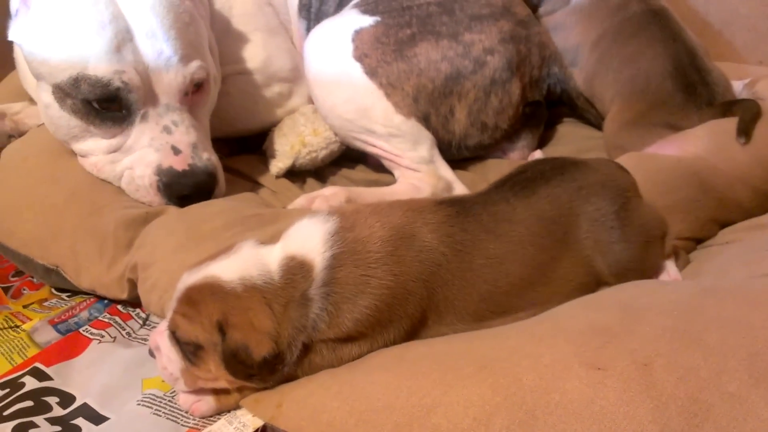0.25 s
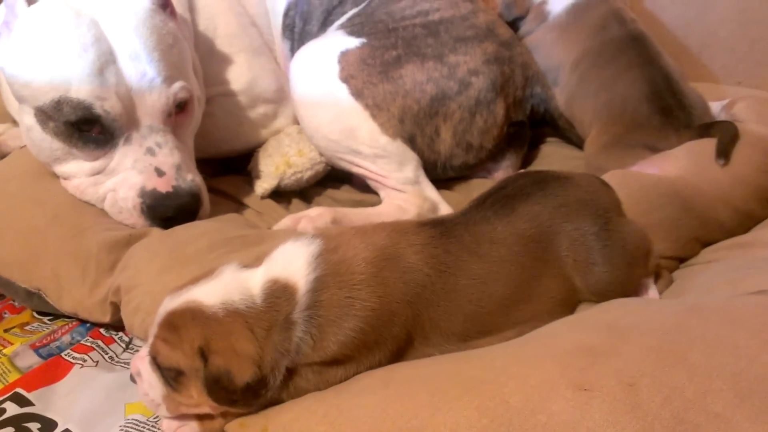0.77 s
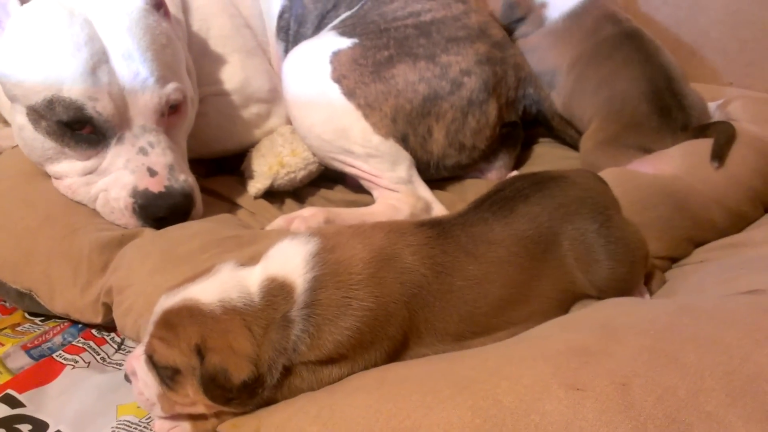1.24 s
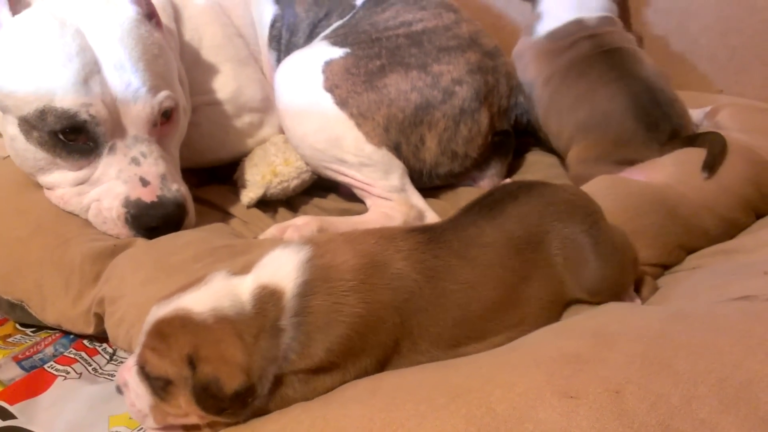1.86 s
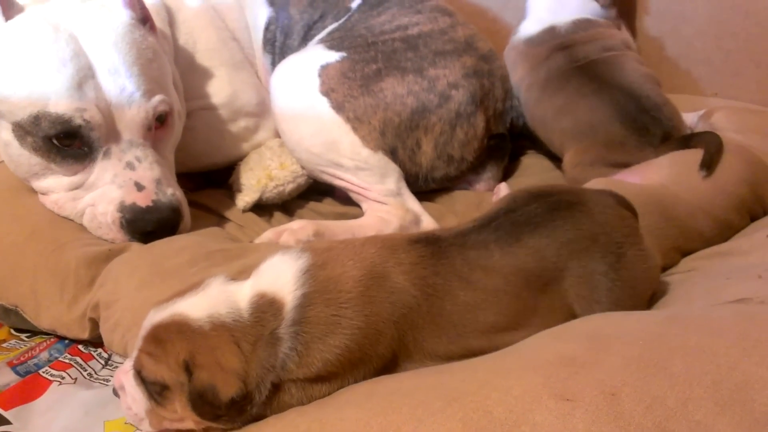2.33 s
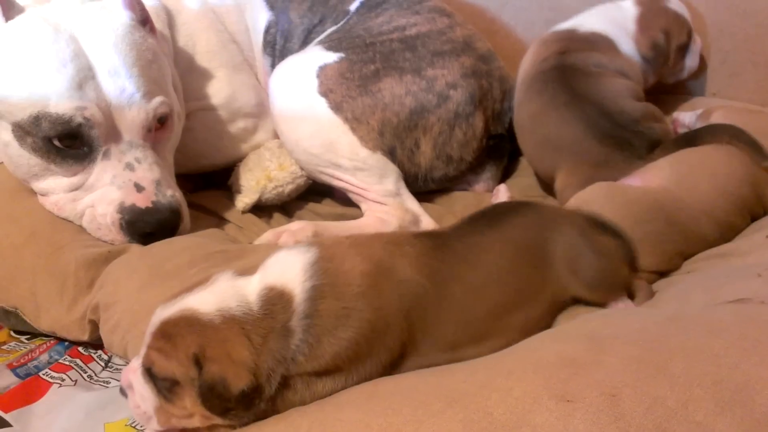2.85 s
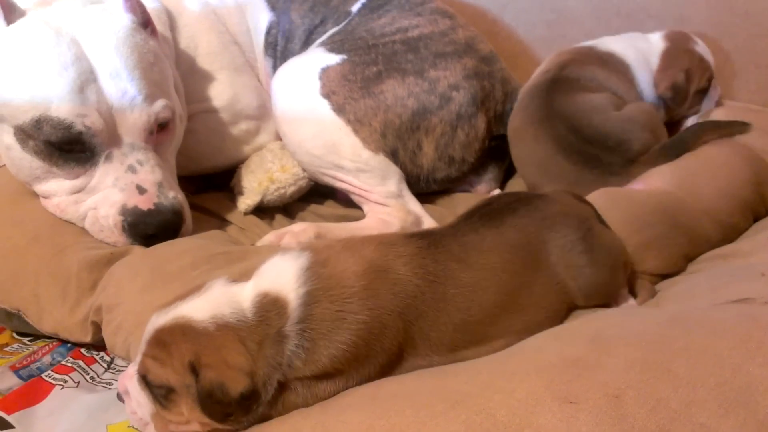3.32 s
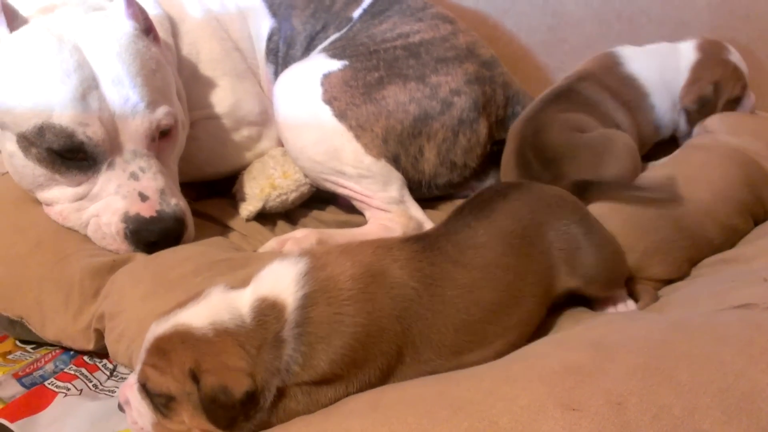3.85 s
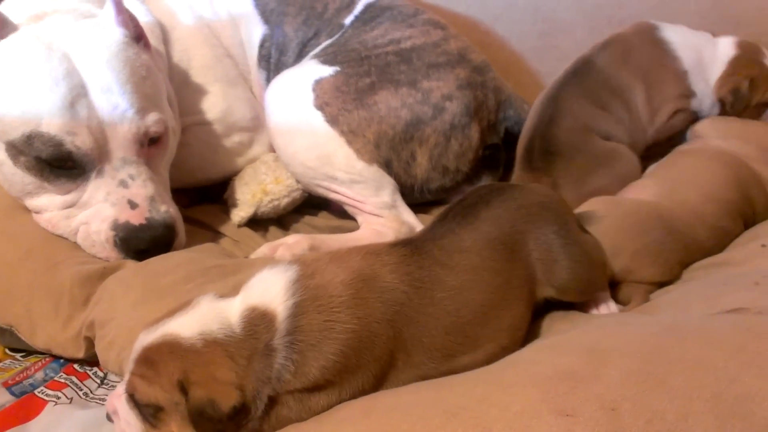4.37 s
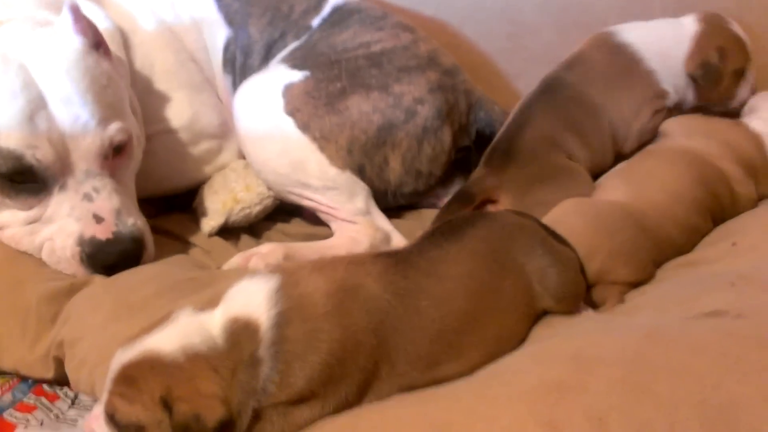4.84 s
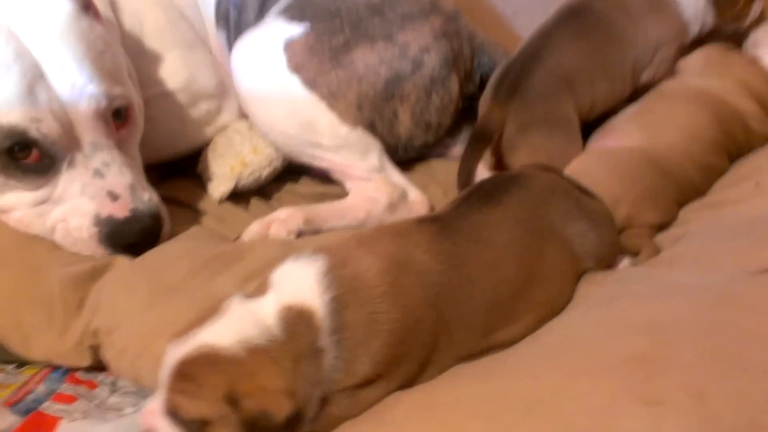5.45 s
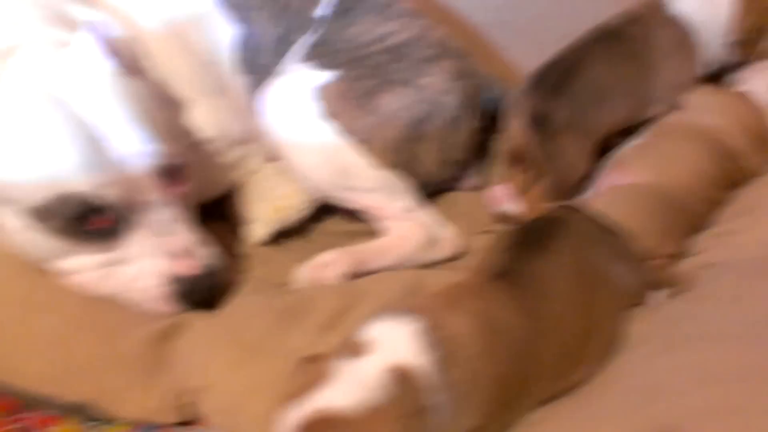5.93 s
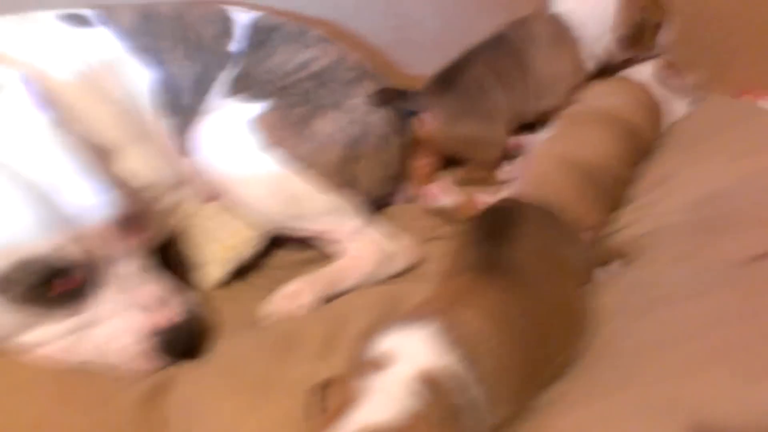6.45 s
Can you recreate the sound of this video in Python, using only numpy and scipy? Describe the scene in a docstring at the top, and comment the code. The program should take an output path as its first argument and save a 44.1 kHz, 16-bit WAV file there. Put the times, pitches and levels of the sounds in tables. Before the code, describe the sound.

High, sometimes hoarse puppy cries break into little squeaks and grunts in a small room, before a puppy scrapes over a cushion.

```python
"""Newborn puppies cry on a cushion in a small room, close to the microphones.
Five long squeals slide between clean and hoarse; then short squeaks break into low grunts.
Each call is a pulse train from the vocal folds, shaped by throat and mouth; squeals and squeaks also
ring in the nose. Gasps, wet mouth clicks and a low grumble sit underneath, over a faint hiss.
At the end a puppy clambers over the bedding, whose slipping fibres scrape and hiss."""
import sys
import numpy as np
from scipy import signal
from scipy.fft import rfft, irfft, next_fast_len
from scipy.io import wavfile
from scipy.ndimage import uniform_filter1d

SR = 44100
rng = np.random.default_rng(int(sys.argv[2]) if len(sys.argv) > 2 else 0)


def unload_wav(signal):
    """Save mono or channel-first audio to the path in sys.argv[1] as 16-bit WAV at rate SR, clipped to [-1, 1]."""
    wavfile.write(
        sys.argv[1],
        SR,
        np.round(np.clip(np.atleast_2d(signal).T, -1, 1) * 32767).astype(np.int16),
    )


N = 295029
TIME = np.arange(N) / SR
BAND_LIMIT_HZ = 15900

# EQ of the room tone: f/Hz, gain/dB
ROOM_TONE_EQ = [(18, -42.5), (30, -20.5), (95, -23), (189, -6), (584, -5), (844, -7.5), (1190, -15.5),
                (1590, -13.5), (1960, -13.5), (4780, -16), (14000, -20.5), (16000, -18.5)]
# reverb time of the room: f/Hz, t60/s
REVERB_TIMES = [(200, 0.17), (800, 0.27), (2000, 0.27), (6000, 0.24), (14000, 0.022)]
# early reflections off near walls: left delay/s, right delay/s, level/dB
REFLECTIONS = [(.0031, 0.0049, -17.5), (.0083, 0.005, -4), (0.0141, .015, -0.5)]
# stereo width of diffuse sound: f/Hz, side gain/dB
DIFFUSE_WIDTH = [(100, -9), (330, 1), (750, -8), (1600, -5.5), (14000, -5)]
# stereo width of the microphone pair: f/Hz, side gain/dB
MIC_WIDTH = [(60, 1.5), (150, -1.5), (320, -9), (600, -6.5), (1000, 2)]
# balance of the microphone pair: f/Hz, left minus right/dB
MIC_BALANCE = [(200, -2.5), (1300, -2.5), (2600, 0), (4400, 7.5), (6300, 5.5), (9000, 0.5), (14000, -0.5)]

# paws and bodies sliding on the bedding: peak t/s, level/dB, rise/s, decay/s, scrape f/Hz
STROKES = [ (5.55, -67, 0.3, .1, 5410), (5.73, -51, 0.056, 0.098, 5400),
           (5.853, -51.5, 0.015, 0.0092, 4100), (6.09, -40, 0.13, 0.029, 4400),
           (6.204, -27, 0.033, 0.041, 5240), (6.313, -31, 0.061, 0.048, 5300),
           (6.536, -25.5, 0.019, 0.017, 3700), (6.653, -42.5, 0.027, 0.05, 5060), ]
# sharp broadband ticks, the crisp edge of one mouth click and then cloth snags: t/s, level/dB, decay/s
SHARP_TICKS = [(4.683, -58, 0.001), (5.59, -53, 0.0028), (5.671, -51, 0.014), (5.707, -32.5, 0.0066),
               (5.711, -29.5, 0.0036), (5.739, -41, 0.0037), (5.758, -44.5, 0.0037), (6.44, -39, 0.033),
               (6.487, -44, 0.0076)]
# EQ of the cloth and the sharp ticks: f/Hz, gain/dB
CLOTH_EQ = [(50, -60), (120, -36), (220, -19.5), (400, -9), (700, -8), (1200, -2), (2200, -3), (4100, 2),
            (5700, 0), (8100, -7), (11000, -14), (16000, -11.5)]
# wet mouth clicks: t/s, level/dB, decay/s
SMACKS = [(1.8145, -44, 0.0035), (1.835, -23, 0.002), (1.851, -27, 0.0011), (2.563, -30, 0.0028),
          (2.96, -53, 0.0031), (4.553, -30.5, 0.0042), (4.683, -31.5, 0.00075)]
# EQ of the mouth clicks: f/Hz, gain/dB
SMACK_EQ = [(50, -44), (150, -23.5), (300, -8.5), (620, 4), (1400, 6.5), (2400, -7), (3300, -16.5),
            (5000, -24.5), (14000, -37)]
# bouts of low rattling grumble: t/s, length/s, level/dB
GRUMBLES = [(3.367, 0.32, -58), (3.678, 0.22, -48.5), (3.844, 0.31, -53)]
# throat resonances on the grumble: f/Hz, gain/dB
GRUMBLE_EQ = [(100, -29), (160, -11), (220, 4), (340, -9), (520, 9), (680, -9), (820, -15), (1200, -29.5),
              (4000, -64)]
# gasps before a cry: t/s, length/s, level/dB
GASPS = [(1.826, 0.046, -29.5), (2.637, 0.086, -42)]
# air through the open mouth: f/Hz, gain/dB
GASP_EQ = [(50, -56), (150, -25), (300, -1), (600, -49.5), (950, -8), (1430, 3), (2000, -10), (2500, -14.5),
           (3300, -1.5), (4200, -24), (6000, -40.5), (14000, -56)]

# grunts, a second vibration in the throat:
# t/s, length/s, first f/Hz, last f/Hz, level/dB, roughness/0-1, overtone gain/dB
GRUNTS = [ (2.736, 0.07, 229, 266.4, -35, 0.38, -5), (2.798, 0.042, 489, 460.3, -27, 0.33, 0),
          (3.172, 0.06, 278.3, 315, -33, 0.1, -5), (3.645, 0.066, 299.3, 328, -32, 0.12, -5),
          (3.937, 0.05, 350, 409, -35, 0.14, -5), (3.981, 0.053, 439, 485.6, -39, 0.4, -3),
          (4.242, 0.044, 394.8, 397.2, -38, 0.15, -3.5), (4.552, 0.038, 403.5, 490, -40, 0.33, 1),
          (4.879, 0.021, 500, 470, -52.5, 0.26, 0), (5.117, 0.055, 332.6, 313.5, -48, 0.28, -2.5),
          (5.45, .1, 398, 471.4, -54.5, 0.63, 1), (5.982, 0.054, 324, 316, -47.5, 0.23, 0),
          (6.064, 0.072, 460.2, 430, -36, 0.07, 0), (6.475, 0.062, 381.8, 419, -43.5, 0.54, 1),
          (6.546, 0.037, 427, 407, -38, 0.25, -1), ]
# throat resonances on a grunt: f/Hz, gain/dB
GRUNT_EQ = [(50, -59), (130, -32), (220, -0.5), (320, 0.5), (450, 6), (620, -5), (920, -6.5), (1200, -25.5),
            (1700, -14.5), (2400, -30.5), (3000, -37), (5400, -37.5), (8000, -64), (14000, -70)]
# short squeaks: t/s, length/s, top f/Hz, rise/s, sag/share of pitch, level/dB, swell/dB, mouth/dB,
# mouth change/dB, nasal ring/dB, first roughness/0-1, last roughness/0-1, subharmonics/0-1,
# break-up/share of length, whistle/dB, whistle f/Hz, whistle peak/share of length
SQUEAKS = [ (3.158, 0.078, 880, .06, 0, -50, 6, -11, 0, -33, 0.29, 0.58, .4, .5, -11.5, 4950, .6),
           (3.622, .11, 791.5, 0.009, 0.03, -37, -7.5, -15.5, -2, -30, 0.11, 0.4, 0.3, .47, -23.5, 5500, .45),
           (3.902, 0.13, 861.7, 0.03, 0.11, -33, 8, -13, 2, -35, 0.15, 0.69, 0.6, 0.36, -28, 5400, 0.61),
           (4.216, 0.093, 813.6, 0.03, 0.12, -34, 11.5, -14, -4, -37, 0.17, 0.72, 0.05, 0.66, -33, 5730, 0.47),
           (4.515, 0.086, 858.4, 0.056, 0.3, -35.5, 2, -11.5, -9, -29, 0.04, 0.65, 0.03, 0.49, -27, 5600, 0.58),
           (4.838, 0.061, 825, 0.042, 0.1, -33.5, 15.5, -11, -3, -37, 0.08, 0.2, 0.1, 0.86, -24, 5550, 0.49),
           (5.398, 0.164, 1030, 0.085, 0.01, -39.5, 10, -3.5, 2.5, -27, 0.15, 0.36, 0.6, 0.29, -11, 5370, .45),
           (5.917, .22, 1083, 0.079, 0.2, -31.5, 16, -3, -5, -25, 0.21, 0.36, .8, 0.67, -13, 5400, .52),
           (6.426, 0.15, 969, 0.078, 0, -31, 3.5, -8.5, 7.5, -23, 0.27, 0.73, 0.7, 0.44, -26, 5400, 0.32), ]
# throat resonances on a squeak: f/Hz, gain/dB
SQUEAK_EQ = [(50, -82), (150, -27), (250, 5), (500, -4.5), (820, 14), (1200, -12), (1700, -1.5),
             (2400, -12.5), (2900, -12), (4300, -19), (5200, -14), (6100, -26), (7000, -35), (9000, -27),
             (13000, -60)]
# throat resonances on the chopped part of a squeak: f/Hz, gain/dB
CHOP_EQ = [(150, -60), (330, -26), (500, -7), (800, 0), (1200, -12), (1700, -2), (2400, -4), (3000, -14),
           (5400, -8)]
# breath hissing in the nose: f/Hz, gain/dB
NASAL_HISS_EQ = [(1500, -59), (2600, -7), (3300, -10), (4000, -1), (4900, 4), (5700, 0.5), (6400, -5.5),
                 (7200, -22), (9000, -39), (13000, -57)]

# contour of each long cry: t/s, pitch f/Hz, level/dB, mouth resonance over that level/dB
CRY_CONTOURS = [
    [(0.0, 1157, -15, 14.5), (0.026, 1032, -32.5, 8.5), (0.052, 953, -18.5, -3.5), (0.09, 965, -26, 4.5),
     (0.16, 842, -26.5, 7.5), (0.292, 842, -23, -0.5), (0.36, 850, -29, 6.5), (0.39, 902, -24.5, -5),
     (0.435, 831, -48.5, 0)],
    [(0.598, 545.3, -60.5, -4.5), (0.638, 582.8, -34.5, -14), (0.692, 623.4, -27.5, -4),
     (0.704, 579, -28.5, -7), (0.77, 543, -19, -5), (0.86, 607.7, -27.5, -7), (0.944, 584.7, -35.5, -3),
     (0.958, 605.5, -29, -15), (0.985, 614, -53.5, -9.5)],
    [(1.118, 844, -58, -9.5), (1.145, 927, -40, -6.5), (1.184, 1087, -34, -6), (1.212, 1030, -41, -18),
     (1.246, 902, -22.5, -1.5), (1.288, 926, -24, -6), (1.398, 918, -19.5, -8), (1.465, 1024, -25, -5),
     (1.505, 1077, -28.5, 3), (1.624, 1124, -24.5, -11.5), (1.735, 1120, -24.5, -5),
     (1.764, 912, -34.5, -10.5)],
    [(1.918, 456, -41, -1.5), (1.936, 476, -38, -13), (1.962, 494.6, -30.5, 9), (1.988, 557, -31.5, -0.5),
     (2.05, 512.5, -30, 11), (2.112, 533.8, -26.5, 2.5), (2.174, 585.7, -30.5, 10),
     (2.298, 596.6, -29, 6.5), (2.37, 724.4, -27, 4), (2.478, 774.3, -26.5, 8), (2.5, 762, -27.5, -4.5),
     (2.54, 750.5, -35.5, -1), (2.585, 770, -40.5, 3)],
    [(2.657, 594, -42.5, -10), (2.69, 621.6, -30, -5), (2.725, 639.4, -34, -1), (2.75, 623.6, -34.5, -1.5),
     (2.78, 537, -36, 5), (2.81, 499, -39.5, 5.5), (2.835, 443, -31, -10), (2.852, 443, -41.5, -2),
     (2.885, 429.5, -48, -8)],
]
# timbre of each cry: nasal ring/dB, its growth/dB, notch f/Hz, notch half-width/Hz, treble tilt/dB,
# hiss/0-1, hoarse opening/s, unsteady opening/s, hoarse ending/s,
# peak strain t/s, extra nasal ring there/dB, sizzle there/dB
CRY_TIMBRES = [ (-23.5, -4.5, 5390, 700, -1.5, 0.01, 0.0013, 0.093, 0.042, 0.036, 8.5, -86),
               (-35.5, 5, 3200, 330, 0, 0.98, .1, 0.16, 0.021, 0.32, 5, -127),
               (-21, 16, 4450, 810, 2, 0.03, 0.073, .12, 0.0013, 1.465, 10, -65),
               (-17.5, 3, 4250, 620, -8, 0.03, 0.023, 0.11, 0.0009, 2.346, 4, -56),
               (-19, 13, 3450, 1100, 1.5, 0.26, 0.019, 0.025, .003, 2.804, 6, -62), ]
# throat resonances on a cry: f/Hz, gain/dB
CRY_EQ = [(50, -78), (130, -46), (250, 1), (400, -20), (560, -5.5), (850, 8.5), (1150, -4), (1350, -1.5),
          (1700, 4.5), (2200, -17), (2650, -25), (3250, -13.5), (3900, -12.5), (4450, -22.5), (5000, -12),
          (5700, -13), (7200, -42.5), (8600, -43), (12000, -95.5)]
# air squeezed past strained folds: f/Hz, gain/dB
SIZZLE_EQ = [(4000, -52), (6800, -10), (8400, 9.5), (9500, -6.5), (11000, -28), (15000, -29)]
# what a rasp adds to a cry: t/s, length/s, roughness/0-1, subharmonics/0-1, hiss/0-1,
# waver/share of pitch, beating from a second, slightly detuned tone/0-1
RASPS = [ (0.704, 0.24, .04, 0.05, 0, .011, .08), (1.224, .23, 0.03, 0, 0.35, .008, .7),
         (1.432, 0.11, 0.15, 0.13, 0.45, .002, 0.16), (1.944, 0.075, .02, 0, 0.05, .012, .12),
         (2.112, 0.075, 0.01, 0, 0.25, 0.011, .1), (2.307, 0.074, 0.01, 0, .25, 0.008, .1),
         (2.472, 0.0898, 0.12, 0.09, 0.6, 0.016, 0), (2.655, 0.085, 0.13, 0.69, 0.47, 0.0011, 0),
         (2.735, 0.1, 0.05, 0.15, 0, .008, .1), (2.828, 0.045, 0.48, 0.24, 0.48, 0.0067, 0.03), ]
# voice breaks, a second tone beside the cry: t/s, length/s, first f/Hz, last f/Hz, level/dB
VOICE_BREAKS = [(0.649, 0.058, 916, 686, -24), (.928, 0.043, 686, 740, -21), (1.736, 0.021, 1026, 874, -24),
                (2.467, 0.091, 850.6, 806.5, -21.5)]


def amp(db):
    """Decibels to gain."""
    return 10 ** (np.asarray(db) / 20)


def unit(x):
    """Scales to an rms of 1."""
    return x / np.sqrt(np.mean(x ** 2) + 1e-20)


def steady(x):
    """Rides the gain to hold the rms at 1."""
    return x / np.sqrt(np.abs(uniform_filter1d(x ** 2, size=900)) + 1e-12)


def curve_at(points, hz):
    """A curve's value at hz, on a log-frequency axis."""
    f, value = np.transpose(points)
    return np.interp(np.log(hz + 1), np.log(f + 1), value)


def eq(x, points):
    """Filters x by a curve of f/Hz, gain/dB."""
    size = x.shape[-1]
    padded = next_fast_len(size + 1024)
    gain = amp(curve_at(points, np.fft.rfftfreq(padded, 1 / SR)))
    return irfft(rfft(x, padded) * gain, padded)[..., :size]


def wobble(size, hz):
    """Random modulation of rms 1, slower than hz."""
    f = np.fft.rfftfreq(size, 1 / SR)
    return unit(irfft(rfft(rng.standard_normal(size)) / (1 + (f / hz) ** 4), size))


def envelope(t, length, attack, release):
    """Smooth attack, hold and release, in seconds; silent before 0 and after length."""
    up, down = np.clip(t / attack, 0, 1), np.clip((length - t) / release, 0, 1)
    return np.sin(np.pi / 2 * up) ** 2 * np.sin(np.pi / 2 * down) ** 2


def until(t, end):
    """A soft switch: 1 at the start, 0 well after end."""
    return 1 / (1 + (t / max(end, 1e-3)) ** 6)


def add(mix, start, sound):
    """Mixes a sound in at its start time."""
    part = mix[..., max(round(start * SR), 0):][..., :sound.shape[-1]]
    part += sound[..., :part.shape[-1]]


def track(calls):
    """Lays (start, sound) pairs on one mono track."""
    out = np.zeros(N)
    for start, sound in calls:
        add(out, start, sound)
    return out


def stereo_noise(size):
    """Diffuse noise at two close microphones."""
    mid, side = rng.standard_normal((2, size))
    side = eq(side, DIFFUSE_WIDTH)
    return np.array([mid + side, mid - side])


def room_tone(db=-63.5):
    """A faint, steady bed of hiss."""
    return amp(db) * unit(eq(stereo_noise(N), ROOM_TONE_EQ))


def room(x, early_db, tail_db):
    """Direct sound, early reflections off near walls, then a short diffuse tail."""
    t = TIME[:SR // 2]
    hz, frame_s, spectra = signal.stft(stereo_noise(len(t)), SR, nperseg=256)
    decay = amp(-60 * frame_s / curve_at(REVERB_TIMES, hz)[:, None])
    tail = signal.istft(spectra * decay, SR, nperseg=256)[1][:, :len(t)]
    tail *= np.clip(t / 0.016, 0, 1)
    response = amp(tail_db) * tail / np.linalg.norm(tail[0])
    response[:, 0] += 1
    for left, right, db in REFLECTIONS:
        response[[0, 1], [round(left * SR), round(right * SR)]] += amp(db + early_db)
    return signal.fftconvolve(x, response, axes=1)[:, :N]


def bedding(grain_db=2.5, catch_db=0.8, scrape_db=5):
    """Each stroke gathers speed and dies away; fibres slip in tiny grains, lifted around one pitch."""
    out, t = np.zeros((2, N)), TIME[:SR] - .5
    for peak_at, db, rise, decay, hz in STROKES:
        level = amp(db) * np.exp(-np.where(t < 0, (t / rise) ** 2, t / decay))
        grip = amp(grain_db * wobble(len(t), 2800) + catch_db * wobble(len(t), 62))
        rustle = eq(grip * stereo_noise(len(t)), CLOTH_EQ)
        scrape = eq(rustle, [(hz / np.sqrt(2), 0), (hz, scrape_db), (hz * np.sqrt(2), 0)])
        add(out, peak_at - .5, level * unit(scrape))
    return out


def ticks(rows, curve):
    """Cloth snags or mouth clicks: noise bursts with a hard attack and a fast decay."""
    out, t = np.zeros((2, N)), TIME[:SR // 10]
    for start, db, decay in rows:
        add(out, start, amp(db) * stereo_noise(len(t)) * np.exp(-t / decay))
    power_kept = np.mean(amp(curve_at(curve, np.linspace(0, SR / 2, num=2048))) ** 2)
    return eq(out, curve) / np.sqrt(power_kept)


def grumble(flap_hz=28, decay_cycles=0.3):
    """Soft tissue flaps in a dog's throat, one puff a flap."""
    cycles = np.cumsum(flap_hz * (1 + 0.065 * wobble(N, 8.1))) / SR
    puffs = np.exp(-(cycles % 1) / decay_cycles) * rng.standard_normal(N)
    level = sum(amp(db) * envelope(TIME - start, length, attack=0.061, release=0.23)
                for start, length, db in GRUMBLES)
    return level * unit(eq(puffs, GRUMBLE_EQ))


def gasps():
    """Air drawn quickly through a puppy's open mouth."""
    level = sum(amp(db) * envelope(TIME - start, length, attack=0.022, release=0.027)
                for start, length, db in GASPS)
    return level * unit(eq(stereo_noise(N), GASP_EQ))


def vocal_folds(hz, rough, sub=0, beating=0, jitter=0.1033, tremor=0.0076, flutter_db=1.9, detune=.095):
    """Pulses of the vocal folds: roughness unsettles their pitch and size and lets air puff through."""
    size = len(hz)
    drift = 1 + tremor * wobble(size, 36) + jitter * rough * wobble(size, 158)
    pitch = uniform_filter1d(hz, size=400) * drift
    # a second, slightly flat tone beats against the main one
    phase = 2 * np.pi * np.cumsum(pitch * (1 + beating * detune / 2)) / SR
    flat_phase = phase - 2 * np.pi * np.cumsum(pitch * detune) / SR
    shapes, fraying = rng.standard_normal((30, 128)), rng.standard_normal((30, 512))
    pulses = np.zeros(size)
    for k in range(1, 30):
        # the pulse keeps changing shape, so each overtone flutters on its own
        flutter = np.interp(TIME[:size] * 45, np.arange(128), amp(flutter_db * shapes[k]))
        # roughness frays the high overtones into hiss first
        fray = .33 * k * rough * np.interp(TIME[:size] * 500, np.arange(512), fraying[k])
        lag = .35 * k ** 2
        overtone = np.cos(k * phase - lag + fray) + beating * np.cos(k * flat_phase - fray)
        pulses += flutter * overtone * (k * hz < BAND_LIMIT_HZ)
    # alternating strong and weak pulses give subharmonics
    pulses = unit(pulses) * (1 + sub * np.cos(phase / 2) + rough * wobble(size, 84))
    puffs = unit((1 + np.cos(phase)) * rng.standard_normal(size))
    breath = np.clip(rough ** 2, 0, .95)
    return np.sqrt(1 - breath ** 2) * pulses + breath * puffs


def nasal_passages(x, notch_hz, width_hz, tilt_db):
    """The nose swallows one band and tilts the treble."""
    notched = eq(x, [(notch_hz - width_hz, 0), (notch_hz, -11.5), (notch_hz + width_hz, 0)])
    return steady(eq(notched, [(3500, 0), (5200, tilt_db)]))


def vocal_tract(pulses, curve, mouth_db, nose_db, nose_shape, hiss, crossovers_hz=(1350, 2650)):
    """Throat, mouth and nose carry lows, mids and highs; in the nose part of the tone turns to hiss."""
    tone = eq(pulses, curve)
    throat, oral = (signal.sosfiltfilt(signal.butter(8, hz, fs=SR, output="sos"), tone)
                    for hz in crossovers_hz)
    ring = nasal_passages(tone - oral, *nose_shape)
    air = nasal_passages(eq(rng.standard_normal(len(tone)), NASAL_HISS_EQ), *nose_shape)
    hiss = np.clip(hiss, 0, 1)
    nasal = np.sqrt(1 - hiss ** 2) * ring + hiss * air
    return steady(throat) + amp(mouth_db) * steady(oral - throat) + amp(nose_db) * nasal


def grunt(start, length, first_hz, last_hz, db, rough, overtone_db, swell_db=12):
    """Slow gliding pulses swell through a nearly shut mouth."""
    t = np.arange(0, length, 1 / SR)
    level = amp(db + swell_db * (t / length - .5))
    level *= envelope(t, length, attack=0.16 * length, release=0.0073)
    tone = eq(vocal_folds(np.linspace(first_hz, last_hz, len(t)), rough), GRUNT_EQ)
    tone = eq(tone, [(first_hz / 2, -6), (first_hz, 0), (2 * first_hz, overtone_db)])
    return start, level * unit(tone)


def nose_whistle(pitch, rough, hz, width_hz=1200):
    """The nose picks out a few high overtones of the folds."""
    nostril = [(hz / 2, -60), (hz - width_hz, -20), (hz, 0), (hz + width_hz, -14), (2 * hz, -40)]
    return unit(eq(vocal_folds(pitch, .28 * rough), nostril))


def squeak(start, length, top_hz, rise, sag, db, swell_db, mouth_db, opening_db, nose_db,
           first_rough, last_rough, sub, breaks_at, whistle_db, whistle_hz, whistle_at, scoop=.19):
    """The folds scoop up to their top pitch, then sag and break up under a nasal whistle."""
    t = np.arange(0, length, 1 / SR)
    progress = t / length
    rising, falling = np.clip(1 - t / rise, 0, 1), np.clip((t - rise) / (length - rise), 0, 1)
    hz = top_hz * (1 - scoop * rising ** 2 - sag * np.sin(np.pi / 2 * falling) ** 2)
    broken = 1 - until(progress, breaks_at)
    rough = first_rough + (last_rough - first_rough) * broken
    pulses = vocal_folds(hz, rough, sub * broken)
    mouth_db = mouth_db + opening_db * (progress - .5)
    voice = vocal_tract(pulses, SQUEAK_EQ, mouth_db, nose_db, nose_shape=(3300, 3300, 0), hiss=0.13)
    whistle = nose_whistle(hz, rough, whistle_hz) * np.exp(-((progress - whistle_at) / .33) ** 2)
    level = amp(db + swell_db * (progress - .5)) * envelope(t, length, attack=0.024, release=0.014)
    return start, level * (voice + amp(whistle_db) * whistle)


def voice_break(start, length, first_hz, last_hz, db, jitter=0.034):
    """One fold slips into an unsteady, almost pure tone of its own."""
    t = np.arange(0, length, 1 / SR)
    hz = np.linspace(first_hz, last_hz, len(t)) * (1 + jitter * wobble(len(t), 200))
    tone = unit(np.sin(2 * np.pi * np.cumsum(hz) / SR))
    return start, amp(db) * envelope(t, length, attack=0.016, release=.025) * tone


def rasp(time):
    """Control curves of the rasping bouts: roughness, subharmonics, hiss, waver and beating."""
    return sum(np.outer(amounts, envelope(time - start, length, attack=0.018, release=0.018))
               for start, length, *amounts in RASPS)


def cry(contour, nose_db, growth_db, notch_hz, notch_width_hz, tilt_db, hiss,
        hoarse_opening, unsteady, hoarse_ending, strain_at, strain_db, sizzle_db):
    """The folds start hoarse, settle into a clean squeal, rasp, strain shrilly and may end hoarse."""
    times, *columns = np.transpose(contour)
    start, length = times[0], times[-1] - times[0]
    t = np.arange(0, length, 1 / SR)
    hz, db, mouth_db = (np.interp(start + t, times, column) for column in columns)
    rasp_rough, sub, rasp_hiss, waver, beating = rasp(start + t)
    strain = np.exp(-((start + t - strain_at) / 0.087) ** 2)
    hoarse = until(t, hoarse_opening) + until(length - t, hoarse_ending)
    rough = np.clip(0.034 + 0.13 * until(t, unsteady) + .75 * hoarse + rasp_rough, 0, 1)
    ring_db = nose_db + growth_db * (t / length - .5) + strain_db * strain
    ring_db += 7 * np.log2(hz / hz.mean())  # a higher note rings more in the nose
    ring_db -= 14.5 * until(length - t, 0.017)  # the ring fades first as the cry ends
    hz *= 1 + (0.0036 + waver) * wobble(len(t), hz=59.6)
    pulses = vocal_folds(hz, rough, sub, beating)
    nose_shape = (notch_hz, notch_width_hz, tilt_db)
    voice = amp(db) * vocal_tract(pulses, CRY_EQ, mouth_db, ring_db, nose_shape, hiss + rasp_hiss)
    sizzle = amp(sizzle_db) * strain * unit(eq(rng.standard_normal(len(t)), SIZZLE_EQ))
    return start, envelope(t, length, attack=0.0059, release=0.0059) * (voice + sizzle)


def puppies(cry_db=4, squeak_db=-1, grunt_db=-1.5, chop_depth=0.47, chop_knee_db=-37.5):
    """The voice bus; a grunt chops the airflow of the squeak that it interrupts."""
    cries = track(cry(contour, *timbre) for contour, timbre in zip(CRY_CONTOURS, CRY_TIMBRES))
    grunts = track(grunt(*row) for row in GRUNTS)
    squeaks = track(squeak(*row) for row in SQUEAKS)
    chop = chop_depth * np.tanh(grunts / amp(chop_knee_db))
    squeaks += eq(squeaks * chop, CHOP_EQ)
    breaks = track(voice_break(*row) for row in VOICE_BREAKS)
    return amp(cry_db) * cries + amp(squeak_db) * squeaks + amp(grunt_db) * grunts + breaks


def scene(rustle_db=1):
    """Voices and foley over the room tone; the cushion muffles the echoes of what lies on it."""
    voices = room(puppies() + gasps() + grumble(), early_db=-4.5, tail_db=-12.0)
    rustle = amp(rustle_db) * (bedding() + ticks(SHARP_TICKS, CLOTH_EQ))
    foley = room(rustle + ticks(SMACKS, SMACK_EQ), early_db=-15.5, tail_db=-21.5)
    return voices + foley + room_tone()


def record(dry, low_cut_hz=110, threshold_db=-25, ratio=4, recovery_db_per_s=40):
    """Two close microphones, the left one brighter; a compressor holds the cries down; a band limit."""
    left, right = signal.sosfilt(signal.butter(2, low_cut_hz, "high", fs=SR, output="sos"), dry)
    mid, side = (left + right) / 2, eq((left - right) / 2, MIC_WIDTH)
    mics = np.array([eq(mid + sign * side, [(hz, sign * db / 2) for hz, db in MIC_BALANCE])
                     for sign in (1, -1)])
    power_db = 10 * np.log10(np.abs(uniform_filter1d((mics ** 2).mean(0), size=500)) + 1e-12)
    fall_db = recovery_db_per_s * TIME
    peak_db = np.maximum.accumulate(power_db + fall_db) - fall_db
    over_db = uniform_filter1d(np.maximum(peak_db - threshold_db, 0), size=200)
    compressed = mics / amp((1 - 1 / ratio) * over_db)
    high_cut = signal.firwin(511, BAND_LIMIT_HZ, window=("kaiser", 9), fs=SR)
    return signal.oaconvolve(compressed, high_cut[None], "same", axes=1)


dry = scene()
out = record(dry)
unload_wav(out)
```